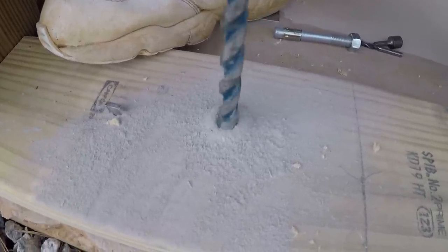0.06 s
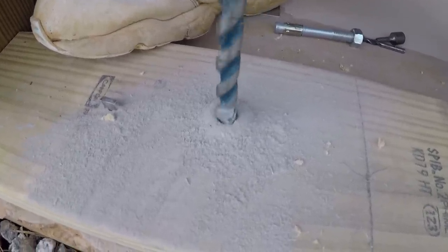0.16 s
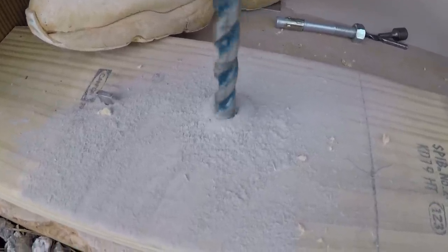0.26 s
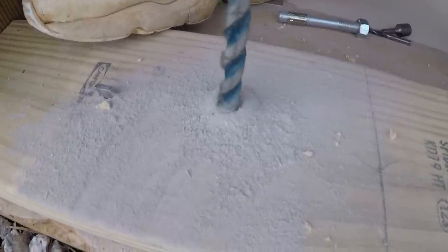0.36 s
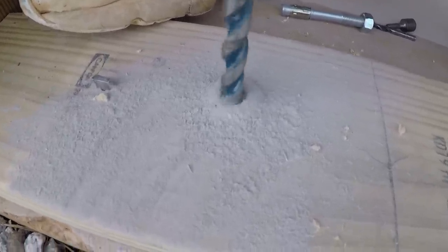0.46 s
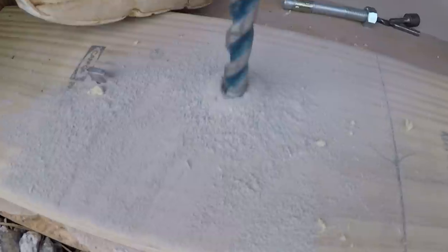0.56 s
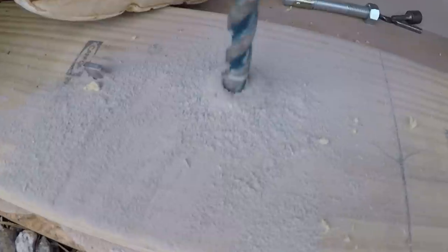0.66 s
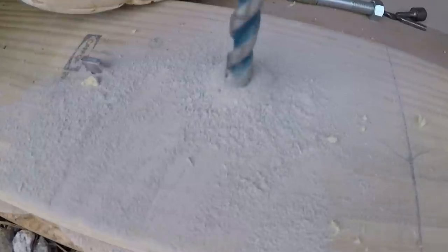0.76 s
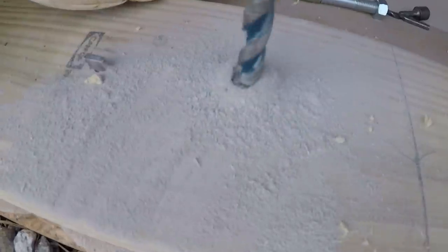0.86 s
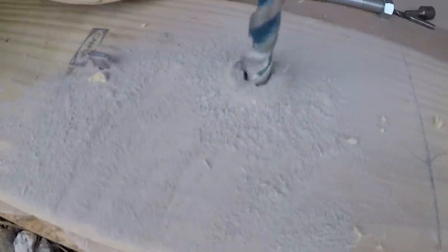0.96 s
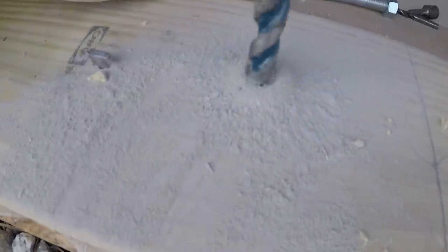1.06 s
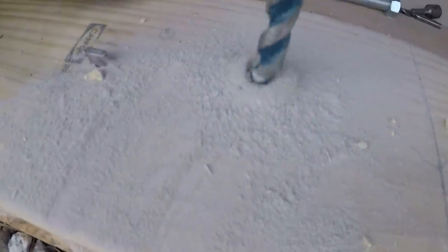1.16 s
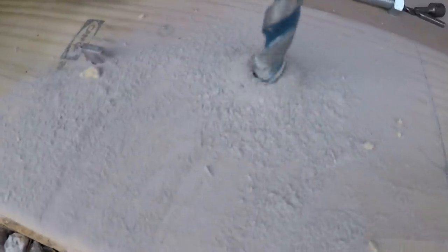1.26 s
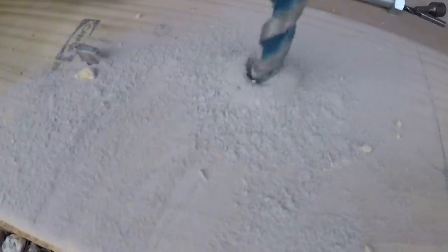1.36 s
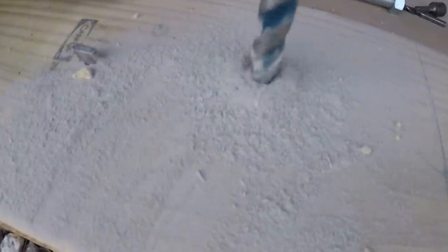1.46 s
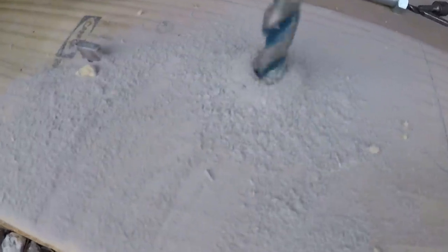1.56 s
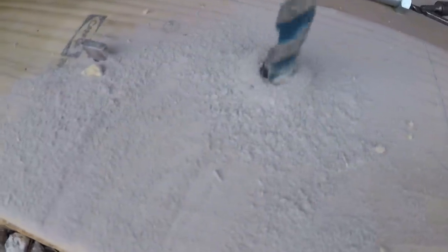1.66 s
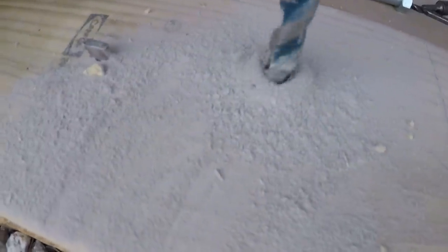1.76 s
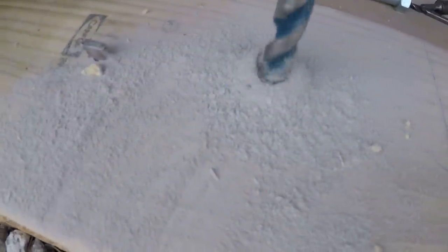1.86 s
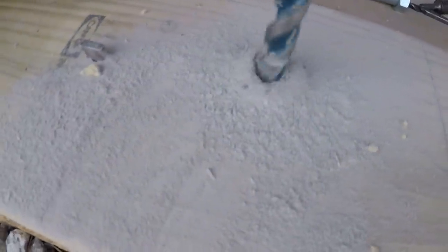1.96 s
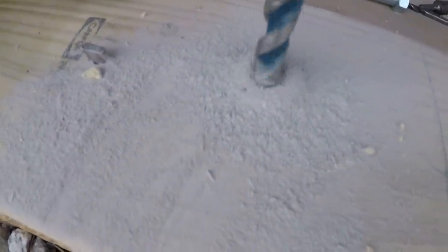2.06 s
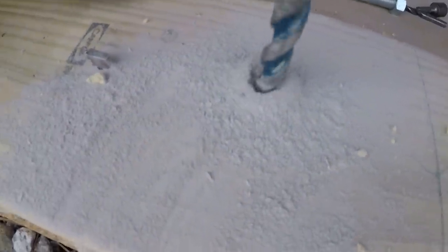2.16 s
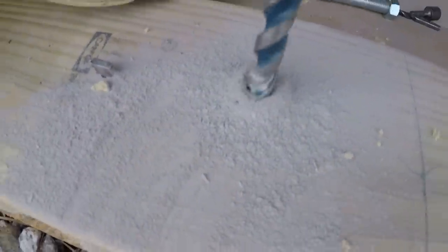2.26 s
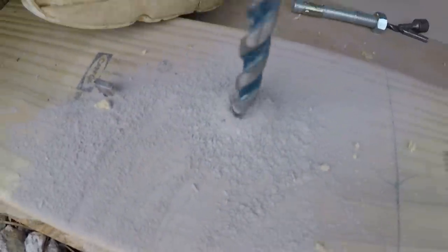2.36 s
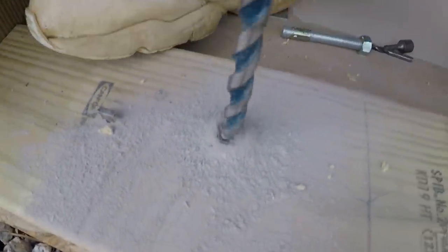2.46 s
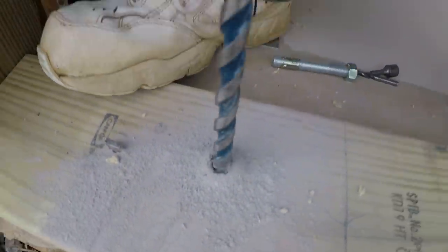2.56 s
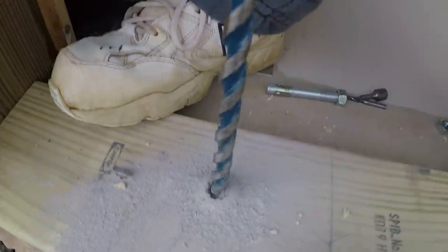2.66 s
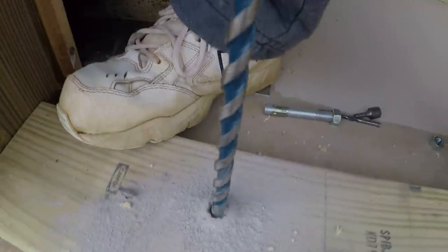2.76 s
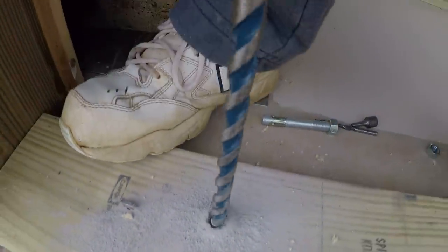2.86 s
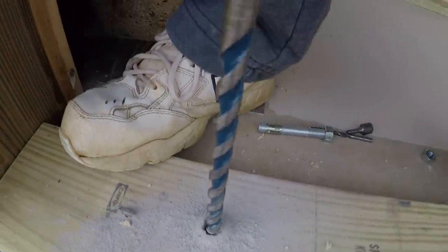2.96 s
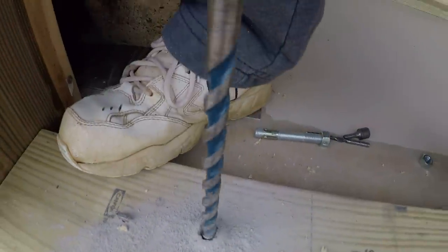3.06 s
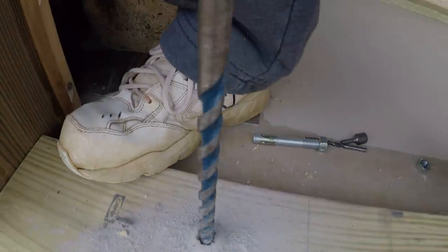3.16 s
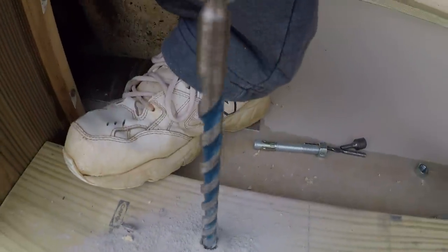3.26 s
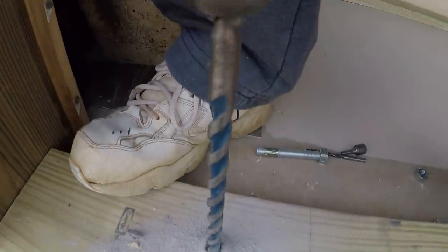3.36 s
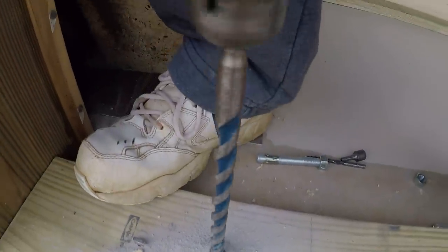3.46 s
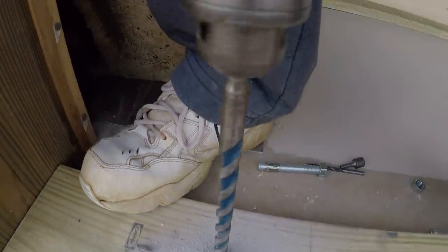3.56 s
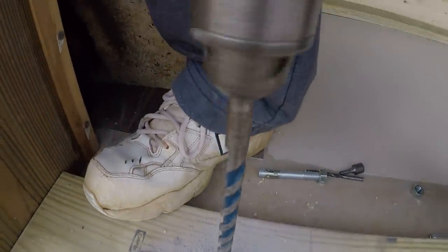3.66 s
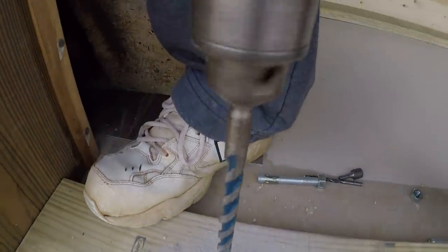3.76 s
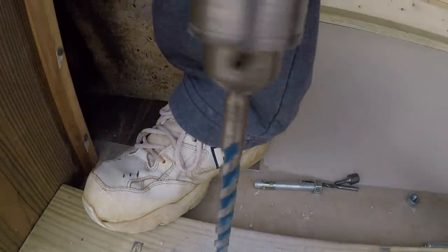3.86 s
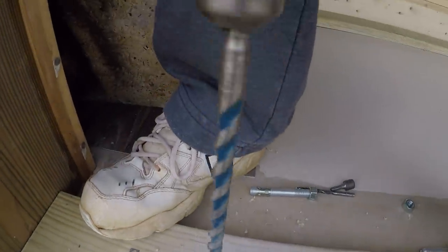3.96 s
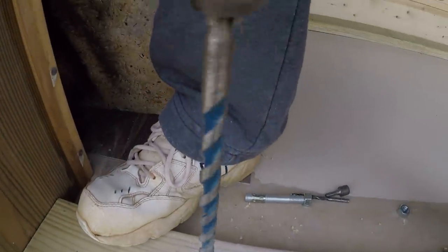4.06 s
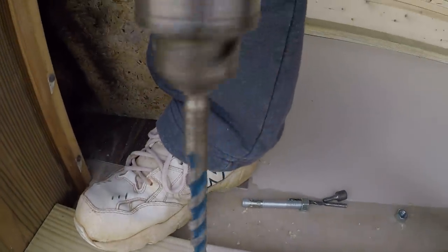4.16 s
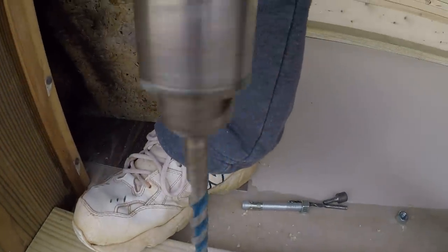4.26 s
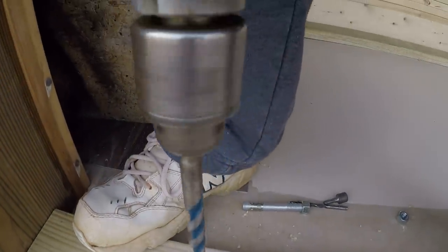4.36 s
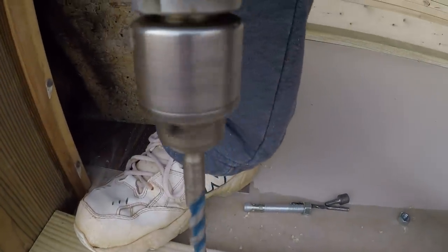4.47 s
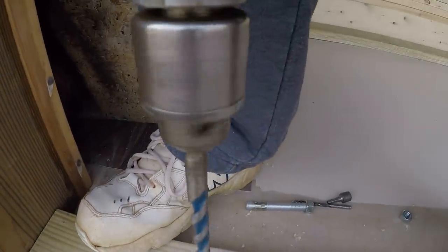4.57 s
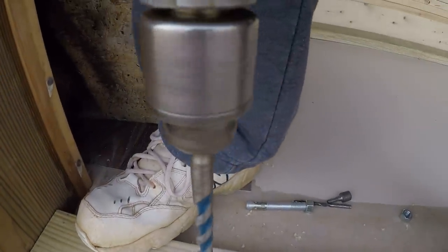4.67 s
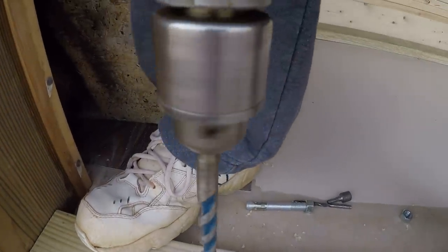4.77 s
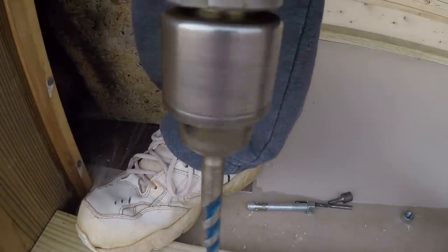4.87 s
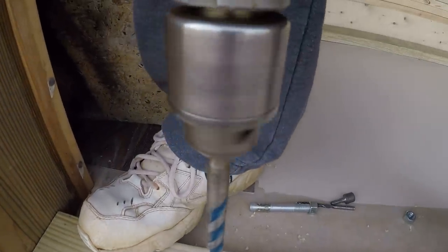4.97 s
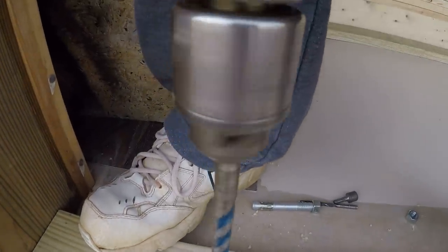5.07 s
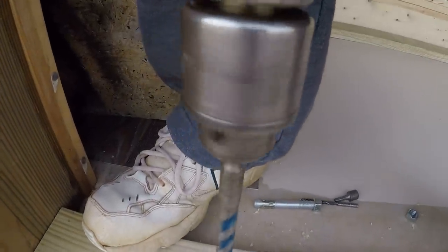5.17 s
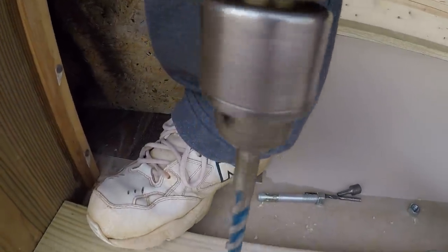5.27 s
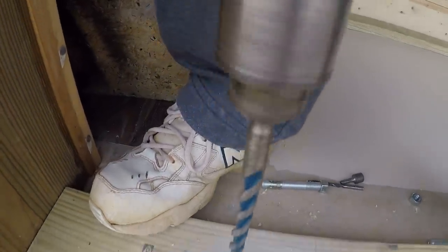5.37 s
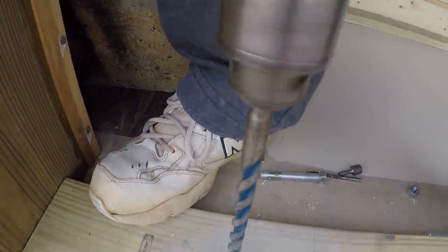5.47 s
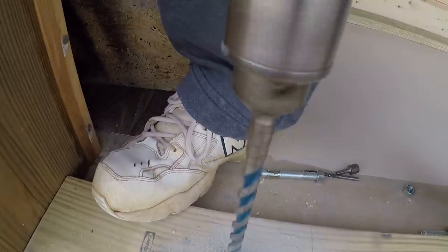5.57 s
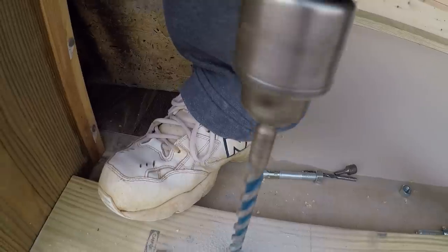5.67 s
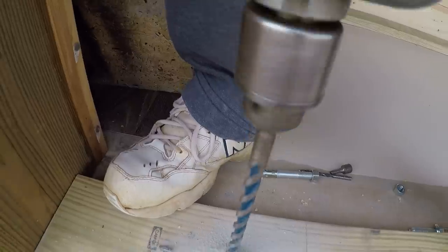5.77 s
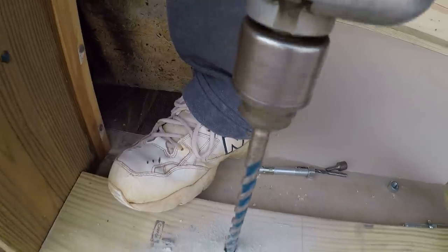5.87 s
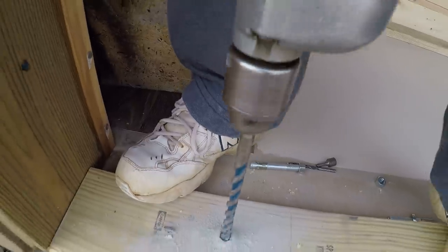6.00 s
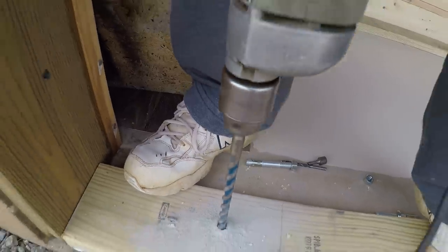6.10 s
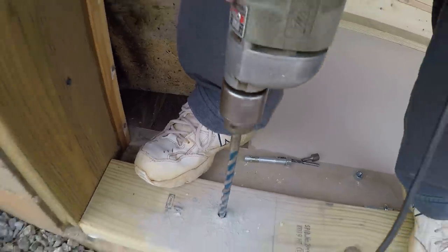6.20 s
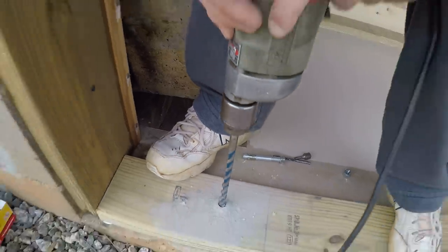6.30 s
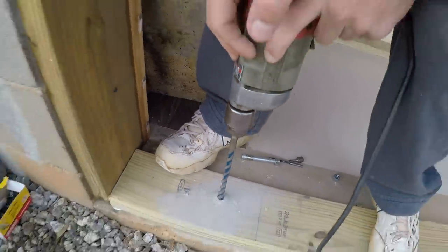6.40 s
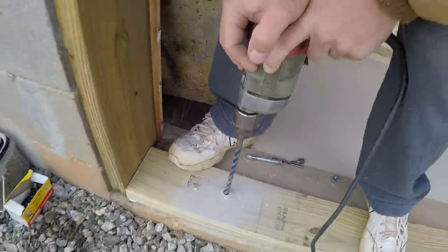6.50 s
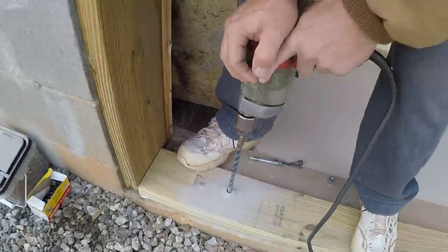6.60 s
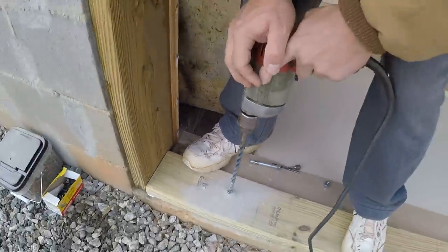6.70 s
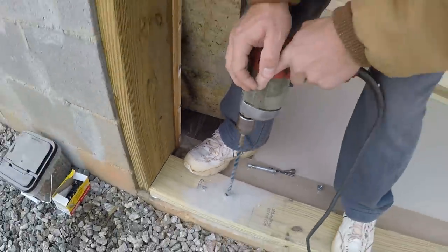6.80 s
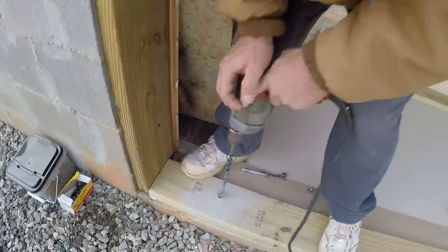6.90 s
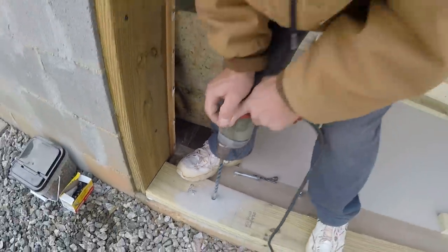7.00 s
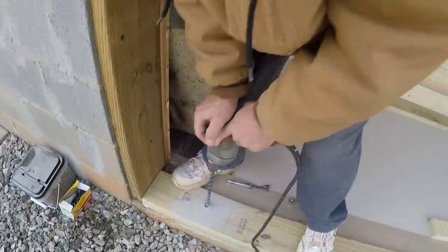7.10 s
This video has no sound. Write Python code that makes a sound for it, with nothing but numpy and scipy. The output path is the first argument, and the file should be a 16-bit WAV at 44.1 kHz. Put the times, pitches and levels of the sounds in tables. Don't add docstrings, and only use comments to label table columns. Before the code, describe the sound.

A hammer drill whines and grinds in concrete through a plank, its bit knocking down repeatedly, then boring steadily as cooling air buffets the microphone.

```python
import sys
import numpy as np
from scipy import signal
from scipy.fft import rfft, irfft, next_fast_len
from scipy.io import wavfile
from scipy.ndimage import uniform_filter1d, map_coordinates

SR = 44100
rng = np.random.default_rng(int(sys.argv[2]) if len(sys.argv) > 2 else 0)


def natural_amplitude(level_db):
    exponent = np.asarray(level_db, float) / 20
    return 10 ** exponent


def transcribe(signal):
    frames = np.atleast_2d(signal).T
    limited = np.clip(frames, -1, 1)
    pcm = np.round(limited * 32767).astype(np.int16)
    wavfile.write(sys.argv[1], SR, pcm)


N = 314874

# (time [s], main tone [Hz], level [dB])
MOTOR = [(0, 4086, -26), (.14, 4215, -26), (.45, 4200, -26), (.7, 4067, -23), (.9, 4200, -28),
         (1.95, 4380, -30), (2.35, 4330, -36), (2.8, 4010, -41), (3.58, 3745, -33), (3.9, 3678, -31),
         (4.1, 4097, -21), (4.53, 4380, -14), (4.72, 4282, -21), (5.09, 3873, -29), (6.14, 3687, -25),
         (6.66, 3820, -42), (6.9, 4210, -38), (7.14, 4350, -22.5)]
# (time [s], peak [dB], crack [dB], motor braking [Hz])
LANDINGS = [
    (0.144, -10, -22, 200),
    (0.397, -11.5, -16, 39.8),
    (0.914, -10, -12.5, 261),
    (1.182, -10, -15.5, 281),
    (1.442, -10.5, -13, 300),
    (1.69, -11.5, -11.5, 300),
    (1.946, -11, -16.5, 400),
    (2.208, -11, -13.5, 380),
    (2.473, -12.5, -11, 249.6),
]
# (first blow [s], last blow [s], first thump [dB], last thump [dB], rattle depth [dB])
HAMMERING = [(0.193, 0.259, -19.5, -32, 0.3), (0.452, 0.757, -17.5, -21, 3), (.955, 1.02, -22.5, -28, 4),
             (1.208, 1.283, -25, -22.5, 4.5), (1.475, 1.54, -21, -22, 6.5), (1.733, 1.796, -21.5, -24.5, 9),
             (1.991, 2.057, -18.5, -24.5, 9), (2.251, 2.349, -18.5, -32, 12.5),
             (2.513, 2.959, -20.5, -22, 5.5), (2.993, 3.565, -25, -21, 4.5), (3.6, 3.928, -26, -39, 3),
             (4.549, 5.182, -28, -33, 3), (5.218, 5.931, -28, -41, 5.5), (5.966, 6.625, -32, -38.5, 5)]
# (time [s], left port [dB], right port [dB])
AIR = [(0, -75, -76), (2.8, -84, -90), (2.95, -42.5, -53), (3.5, -37, -39), (3.75, -26.5, -27),
       (3.89, -21, -46), (4.0, -34.5, -35), (4.2, -44.5, -42), (4.34, -37, -30.5), (4.65, -36.5, -27),
       (4.9, -26.5, -23.5), (5.14, -16, -35), (5.7, -16.5, -37), (5.83, -19, -39), (5.95, -40, -36.5),
       (6.2, -62, -48), (6.64, -60, -48), (7.14, -68, -47)]
# (frequency [Hz], level per Hz [dB])
FAN = [
    [(150, -29), (400, -25.5), (700, -9.5), (850, 3), (1000, 3.5), (1130, 6.5), (1350, -5.5), (1600, -0.5),
     (1800, -5.5), (2000, -22.5), (2600, -71), (4000, -71.5)],
    [(150, -35), (400, -15), (750, -4.5), (900, 2), (1200, 3.5), (1400, -2.5), (1600, -8), (2000, -13.5),
     (2600, -67), (4000, -79)],
]
# (frequency [Hz], level per Hz [dB])
GEARS = [
    [(1200, -22.5), (1900, -4.5), (2200, 2), (2500, 4), (3000, 2.5), (3500, -5.5), (4100, -5.5),
     (4500, -3.5), (4900, -11), (6500, -75)],
    [(1200, -45), (1900, -11.5), (2300, 4.5), (2800, 2.5), (3300, 1.5), (3800, -1), (4400, -6.5),
     (4900, -9), (6500, -40)],
]
# (frequency [Hz], level per Hz [dB])
GRIT = [(3500, -51), (5000, -5.5), (5500, -1), (6100, 0.5), (6500, -1.5), (7000, 1.5), (7700, -1.5),
        (8200, -5.5), (9000, -13), (10500, -53)]
# (frequency [Hz], level per Hz [dB])
CASING = [(3500, -40), (5000, -6.5), (6300, -4.5), (6800, 0), (7300, -5.5), (8200, -11), (9000, -19),
          (10500, -53)]
# (frequency [Hz], level per Hz [dB])
FIZZ = [(7000, -22), (8800, 0.5), (10000, -3.5), (11300, -7.5), (12000, -19), (12800, -14), (14300, -27),
        (15300, -52)]
# (frequency [Hz], level [dB])
BUFFET = [(20, -68), (60, -8.5), (130, 0), (240, -1), (400, -5.5), (800, -9), (1500, -21.5), (4000, -110)]
# (time [s], peak [dB])
SLAPS = [(3.717, -8), (3.747, -6), (3.781, -1.5), (3.816, -6), (3.834, -1.5), (3.849, -6), (3.864, -5),
         (3.887, -8), (3.899, -5), (3.917, -6), (3.941, -8), (3.957, -8), (3.969, -9)]
# (frequency [Hz], level [dB])
LEAK = [(100, -41), (250, -15), (450, -8), (1000, -4.5), (3000, 13)]
# (frequency [Hz], width [Hz], level [dB])
PLANK = [(170.2, 17.5, 3.5), (236, 48, 6), (457, 500, -5), (810, 240, -18)]
# (frequency [Hz], length [s], level [dB])
STEEL = [(2895, 0.003, -29), (4560, 0.0033, -10), (6200, 0.0033, -2.5), (6630, 0.0036, -6),
         (7900, .005, -38)]
# (time [s], level [dB], seen from below 0 to the side 1 [share])
CHUCK = [(.2, -16, 0), (2.3, -19, 0), (2.5, -15.5, 0), (3.5, -16, .1), (3.7, -25, .15), (4.55, -17, .3),
         (5.05, -17, .3), (5.25, -30, .6), (5.68, -24, 1), (5.85, -15, 1), (6.1, -12, 1), (6.5, -13, 1),
         (6.56, -30, 1)]
# (frequency [Hz], left minus right [dB], lag of the right [rad], likeness [0-1])
PORTS = [(100, 0.5, 0.39, 0.6), (207, 2.5, 0.94, 0.9), (440, 9, 1.05, 0.74), (751, 4.5, 3.13, 1),
         (993, -4, 3.7, 0.96), (1340, 0, 4.6, 0.76), (1820, 10, 6.06, 0), (2240, -5, 4.6, 0.94),
         (3300, 6, 6.1, 0.73), (4200, 9, 6.7, 0.82), (6770, 20, 7.7, 0.6), (8140, 14.5, 7.9, 0.3),
         (9260, 4.5, 7.4, 1), (14000, 2.5, 8.1, 0)]
# (time [s], height from bit 0 to motor 1 [share], backed off [0-1])
PLACE = [
    (0, 0.12, 0.13),
    (2.4, 0.013, 0.43),
    (3.4, 0.17, 0.11),
    (4, 0.98, 0.02),
    (4.7, 1, 0.23),
    (5.6, 0.49, 0.12),
    (6.1, 0.77, 0.5),
    (6.6, 0.79, 0.99),
    (7.14, 0.7, 0.93),
]
# (time [s], nearness [dB], brightness of the drill [dB])
VIEW = [(0, .5, -0.4), (.8, -0.2, -1.8), (1.6, -0.3, 0.8), (2.5, -1.05, 0.4), (3.7, .1, 0), (3.8, -3, -5),
        (3.9, 0.5, -12.5), (4.05, -1, -7), (4.45, 0.5, -5), (4.6, 3.9, -11), (5.03, 1.9, -4.5),
        (5.29, -2, -23.5), (5.75, -2.5, -21), (5.93, 1.1, -18.5), (6.3, 0.2, -12.5), (6.5, -1.5, -9.5),
        (6.7, -6, -6), (7.14, -4.5, 0.5)]
# (frequency [Hz], left [dB], right [dB])
FAR = [(1086, -5, -7), (1500, -7.5, 8), (1900, 6, 4.5), (2700, -3.5, -24), (3190, -13.5, 6.5),
       (3800, -0.5, 10), (4570, -4.5, 4.5), (6350, -6, -2), (8500, -9, 4)]
# (idle level [dB], gain under load [dB], gain per dB of rattle [dB], share of the brightness
LAYERS = [
    (-23.5, -2.5, -.45, 0.058, 1.1),
    (-26.5, 3, -0.0647, 0.2, 0.62),
    (-26.5, 0.6, 0.28, 0.54, 0.53),
    (-38, 0.6, 0.47, 1.09, 0.45),
]
# (time [s], drop [dB])
DUCKS = [
    (5.43, -4),
    (5.51, 10),
    (5.57, 13),
]

CYCLES_PER_BLOW, BARS = 137, 12
PRESS_S, LIFT_S = .035, .006
JOLT_S, INERTIA_S = .2, .07
MASKED_DB_PER_HZ, TONE_DB_PER_HZ, BRIGHTENED = .05, .015, 0.87
FAN_DB_PER_HZ = .015
OCTAVE_DB, SHAFT_DB = (1, -9.5), (-59, -38)
LIFT_DB, LIFT_GROWS, RECOVER_S, LAND_DB, SETTLE_S, DUCK_S = 1.5, 0.47, 0.042, 2.5, 0.063, .018
CHUCK_HZ, CHUCK_LEAD_MS, CHUCK_SCATTER = (2470, 2255), 14, (.6, .08)
AGAIN_S, AGAIN_DB = .016, (-7, -18)


def unit(x):
    return x / np.sqrt(np.mean(np.atleast_2d(x).mean(0) ** 2) + 1e-20)


def along(points, hz, order=1):
    cols = np.transpose(points)
    return np.interp(np.log(hz + 1), np.log(cols[0] + 1), cols[order])


def curves(rows):
    s, *cols = np.transpose(rows)
    return [np.interp(np.arange(N) / SR, s, c) for c in cols]


def wobble(rate):
    knots = rng.standard_normal(int(N * rate / SR) + 4)
    return map_coordinates(knots, [np.arange(N) * rate / SR])


def filtered(x, response):
    m = next_fast_len(N + SR // 5)
    return irfft(rfft(x, m) * response(np.fft.rfftfreq(m, 1 / SR)), m)[..., :N]


def ports(x, other, colour=lambda f: 1):
    m = next_fast_len(N + SR // 5)
    f = np.fft.rfftfreq(m, 1 / SR)
    same, twin = rfft([x, other], m) * colour(f)
    alike = np.clip(along(PORTS, f, order=3), 0, 1)
    tilt = natural_amplitude(along(PORTS, f) / 2)
    right = alike * same + np.sqrt(1 - alike ** 2) * twin
    right = right * np.exp(-1j * along(PORTS, f, order=2))
    return irfft([same * tilt, right / tilt], m)[:, :N]


def rush(spectrum, grain_db, grain_rate):
    pair = rng.standard_normal((2, N)) * natural_amplitude(grain_db * wobble(grain_rate))
    return unit(ports(*pair, lambda f: natural_amplitude(along(spectrum, f))))


def seen(spectra, grain_db, grain_rate):
    turn = np.clip(curves(PLACE)[0], 0, 1) * np.pi / 2
    at_bit = np.cos(turn) * rush(spectra[0], grain_db, grain_rate)
    return at_bit + np.sin(turn) * rush(spectra[1], grain_db, grain_rate)


def fading(times, sizes, decay_s):
    keep = np.exp(-1 / (decay_s * SR))
    steps = np.bincount((np.asarray(times) * SR).astype(int), sizes, N)
    return signal.lfilter([1], [1, -keep], steps)


def load():
    pressed, rattle = np.zeros((2, N))
    for first, last, *_, depth in HAMMERING:
        span = slice(int((first - PRESS_S) * SR), int((last + LIFT_S) * SR))
        pressed[span], rattle[span] = 1, depth
    landed, *_, brake_hz = np.transpose(LANDINGS)
    drag = pressed * fading(landed, brake_hz, JOLT_S)
    return uniform_filter1d([pressed, rattle, drag], SR // 60)


def speed(brake_hz):
    keep = np.exp(-1 / (INERTIA_S * SR))
    free_hz = uniform_filter1d(curves(MOTOR)[0], SR // 12)
    return free_hz - signal.lfilter([1 - keep], [1, -keep], brake_hz)


def blows(hz):
    turns = np.cumsum(hz)
    rows = []
    for first, last, db0, db1, depth in HAMMERING:
        start, end = turns[int(first * SR)], turns[int(last * SR)]
        count = round((end - start) / SR / CYCLES_PER_BLOW) + 1
        at = np.searchsorted(turns, np.linspace(start, end, count))
        rows += zip(at, np.linspace(db0, db1, count), np.full(count, depth))
    return np.transpose(rows)


def levels(pressed, rattle):
    near_db, bright_db = curves(VIEW)
    first, last, *_, depth = np.transpose(HAMMERING)
    lifted = np.append(first[1:] - last[:-1] > 2 * PRESS_S, True)
    landed = np.transpose(LANDINGS)[0]
    duck = fading(last + LIFT_S, lifted * (LIFT_DB + LIFT_GROWS * depth), RECOVER_S)
    duck += fading(landed + .015, LAND_DB + 0 * landed, SETTLE_S)
    t = np.arange(N) / SR
    duck += sum(db * np.exp(-((t - s) / DUCK_S) ** 2) for s, db in DUCKS)
    return [idle_db + near_db + load_db * pressed + grows * rattle + bright * bright_db - share * duck
            for idle_db, load_db, grows, bright, share in LAYERS]


def air():
    left_db, right_db = curves(AIR)
    lumps_db = [0.25 * wobble(35) + 2.4 * wobble(150), 0.36 * wobble(30)]
    eddies = rng.standard_normal((2, N)) * natural_amplitude(lumps_db)
    left = natural_amplitude(left_db + 6.5) * unit(filtered(eddies[0], lambda f: natural_amplitude(along(BUFFET, f))))
    t = np.arange(SR // 50) / SR
    swing = np.cos(2 * np.pi * 150 * t) + 1.2 * np.exp(-t / .0006) - .3
    onset = 1 - np.exp(-t / .0002)
    for s, db in SLAPS:
        left[round(s * SR):][:len(t)] += natural_amplitude(db - 60 * t / .028) * onset * swing
    low = unit(filtered(eddies[1], lambda f: f / 90 / (1 + (f / 90) ** 4)))
    low = natural_amplitude(right_db - 0.5) * low
    leak = filtered(left, lambda f: natural_amplitude(along(LEAK, f)))
    return np.array([left + 0.7 * low, low - leak])


def thumps(at, thump_db):
    push, t = np.zeros(N), np.arange(SR // 3) / SR
    push[at.astype(int) + 300] = -natural_amplitude(thump_db + 36.5 + .8 * rng.standard_normal(len(at)))
    push -= 0.26 * np.roll(push, 760)
    tail = natural_amplitude(-51) * np.abs(push)
    for s, db, *_ in LANDINGS:
        push[round(s * SR) + 260] -= natural_amplitude(db + 34)
        push[round((s + .014) * SR)] -= natural_amplitude(db + 16.5)
        tail[round(s * SR) + 260] += natural_amplitude(db - 1.0)
    rumble = signal.fftconvolve(tail, natural_amplitude(-60 * t / 0.39))[:N]
    push += rng.standard_normal(N) * rumble

    def wood(f):
        return sum(natural_amplitude(db) * 1j * f * w / (c * c - f * f + 1j * f * w) for c, w, db in PLANK)

    return ports(push, push, lambda f: wood(f) / (1 + (125 / (f + 1)) ** 10))


def chuck(at):
    out, t = np.zeros(N + SR), np.arange(-SR // 40, SR // 40) / SR
    db, side = curves(CHUCK)
    hz, lead_ms = np.interp(side, (0, 1), CHUCK_HZ), CHUCK_LEAD_MS * side
    scatter, again_db = np.interp(side, (0, 1), CHUCK_SCATTER), np.interp(side, (0, 1), AGAIN_DB)
    for i, draws in zip(at.astype(int), rng.standard_normal((len(at), 2, 3))):
        for again, (pitch, size, when) in enumerate(draws * scatter[i]):
            sliding_hz = hz[i] * (1 + .1 * pitch - .8 * t)
            ring = np.exp(-(t / 0.0045) ** 2) * np.sin(2 * np.pi * sliding_hz * t)
            start = i - SR // 40 - int((lead_ms[i] + 4 * when) * SR / 1000 - again * AGAIN_S * SR)
            out[start:][:len(t)] += natural_amplitude(db[i] - 1.3 + 1.4 * size + again * again_db[i]) * ring
    return ports(out[:N], np.roll(out[:N], 70))


def bit(at, depth, grit_db):
    steel, t = np.zeros(N + SR), np.arange(SR // 20) / SR
    for i, draw, d in zip(at.astype(int), rng.random((len(at), len(STEEL), 3)), depth):
        for (hz, length, db), (when, size, pitch) in zip(STEEL, draw):
            tone = np.sin(2 * np.pi * hz * (.98 + .04 * pitch) * t)
            ring = np.exp(-((t - .025) / length) ** 2) * tone
            start = i - int((.03 - .016 * when) * SR)
            steel[start:][:len(t)] += natural_amplitude(grit_db[i] + db + 6 + .6 * d - 14 * size) * ring
    for s, db, crack_db, _ in LANDINGS:
        crack = natural_amplitude(db + crack_db + 15.5 - 60 * t / 0.028) * rng.standard_normal(len(t))
        steel[round(s * SR) + 230:][:len(t)] += crack

    def colour(f):
        return (f / 500) ** 2 / (1 + (f / 500) ** 2) / (1 + (f / 8500) ** 8)

    return ports(steel[:N], np.roll(steel[:N], 90), colour)


def swell(at, size, lead, rise, fall):
    t = np.arange(-SR // 20, SR // 20) / SR - lead
    shape = np.exp(-np.where(t < 0, t / rise, t / fall) ** 4)
    return signal.fftconvolve(np.bincount(at.astype(int), size, N), shape, "same")


def pulsing(gate_db):
    return natural_amplitude(gate_db) / np.sqrt(np.abs(uniform_filter1d(natural_amplitude(2 * gate_db), SR // 14)))


def machine(at, depth, fan_db, gear_db, grit_db, fizz_db):
    luck = rng.standard_normal((len(at), 2))
    gear = swell(at, depth * (.6 + .22 * luck[:, 0]), lead=.008, rise=.005, fall=.012)
    grit = swell(at, depth * (.8 + .2 * luck[:, 1]), lead=.011, rise=.017, fall=.004)
    out = natural_amplitude(fan_db - 1.66) * seen(FAN, grain_db=1.0, grain_rate=60)
    out += natural_amplitude(gear_db + 0.5) * pulsing(gear) * seen(GEARS, grain_db=2.0, grain_rate=300)
    out += natural_amplitude(grit_db + 1.33) * pulsing(grit) * seen([GRIT, CASING], grain_db=2.0, grain_rate=560)
    out += natural_amplitude(fizz_db + 3.0) * pulsing(0.81 * grit) * rush(FIZZ, grain_db=2.0, grain_rate=150)
    return out


def motor(hz, drag):
    free_hz, db = curves(MOTOR)
    height, bright_db = curves(PLACE)[0], curves(VIEW)[1]
    db = db - MASKED_DB_PER_HZ * drag - TONE_DB_PER_HZ * (free_hz - hz) + BRIGHTENED * bright_db
    octave_db = db + np.interp(height, (0, 1), OCTAVE_DB)
    shaft_db = np.interp(height, (0, 1), SHAFT_DB) + 0.52 * bright_db
    phase = 2 * np.pi * np.cumsum(hz * (1 + 0.00079 * wobble(60))) / SR
    tones = natural_amplitude(db + 0.5 + 1.7 * wobble(30)) * np.sin(phase)
    tones += natural_amplitude(octave_db - 2.5 + 2.3 * wobble(30)) * np.sin(2 * phase)
    tones += natural_amplitude(shaft_db + 3.0 * wobble(5.3)) * np.sin(phase / BARS)
    return ports(tones, np.roll(tones, 3))


def scene():
    pressed, rattle, drag = load()
    hz = speed(drag)
    at, thump_db, depth = blows(hz)
    layer_db = levels(pressed, rattle)
    layer_db[0] -= FAN_DB_PER_HZ * (curves(MOTOR)[0] - hz)
    near = chuck(at) + bit(at, depth, layer_db[2]) + machine(at, depth, *layer_db) + motor(hz, drag)
    far = filtered(near, lambda f: natural_amplitude([along(FAR, f), along(FAR, f, order=2)]))
    far -= filtered(far.mean(0), lambda f: 0.52 * np.exp(-((f - 850) / 130) ** 2))
    share = np.clip(curves(PLACE)[1], 0, 1)
    return air() + thumps(at, thump_db) + near + share * (far - near)


def band_limit(x):
    return signal.sosfilt(signal.butter(12, 15070, fs=SR, output="sos"), x)


def record(dry):
    mix = dry / (1 + np.abs(dry / .9) ** 8) ** (1 / 8)
    return band_limit(mix)


dry = scene()
out = record(dry)
transcribe(out)
```